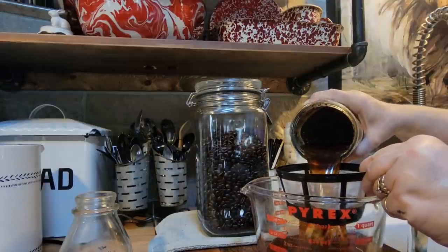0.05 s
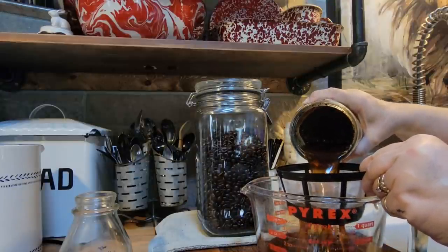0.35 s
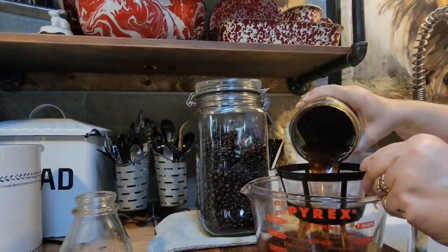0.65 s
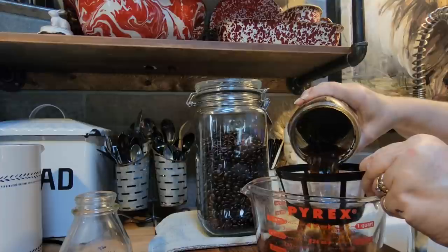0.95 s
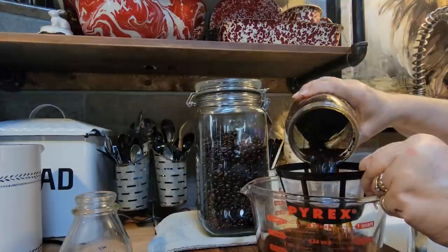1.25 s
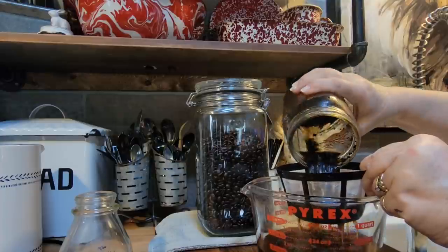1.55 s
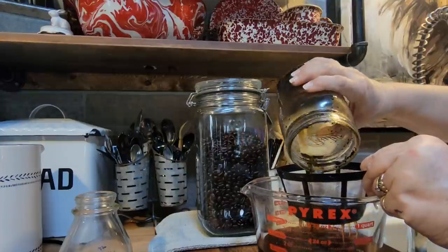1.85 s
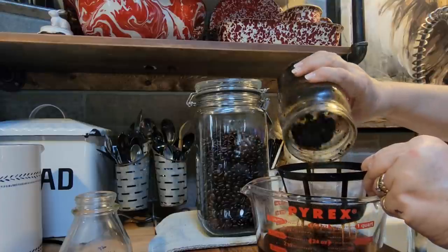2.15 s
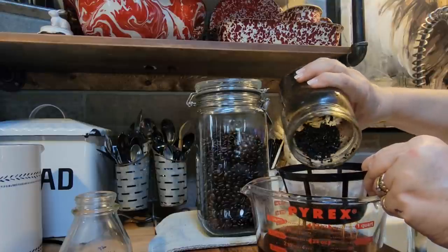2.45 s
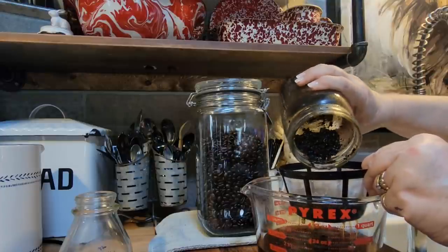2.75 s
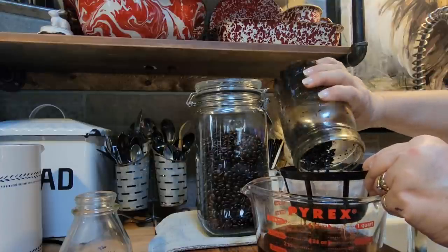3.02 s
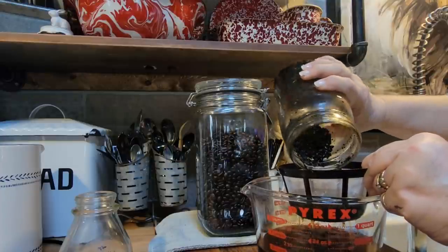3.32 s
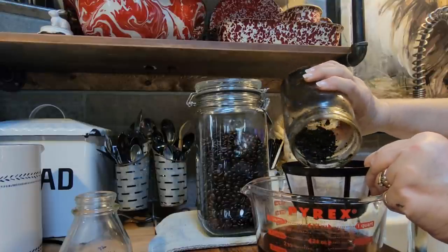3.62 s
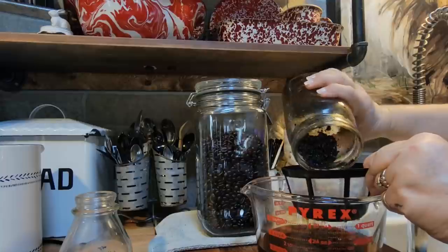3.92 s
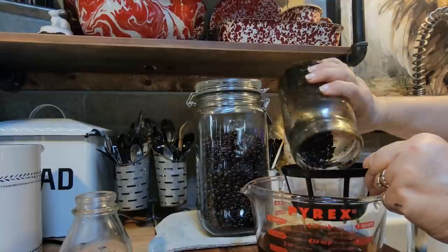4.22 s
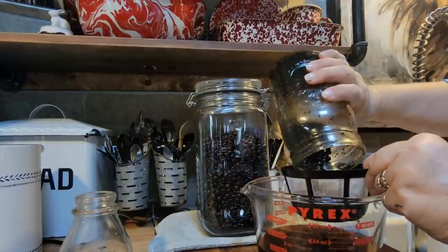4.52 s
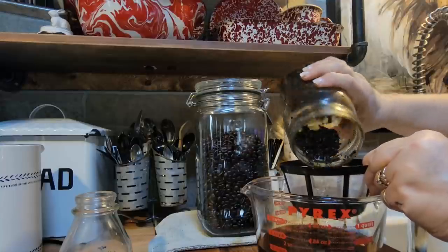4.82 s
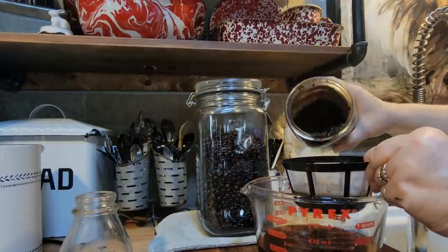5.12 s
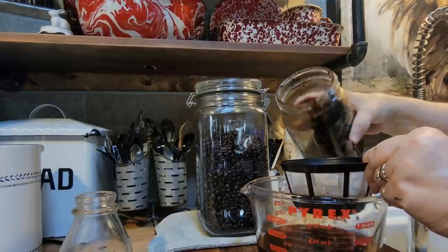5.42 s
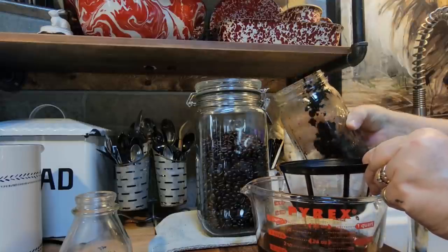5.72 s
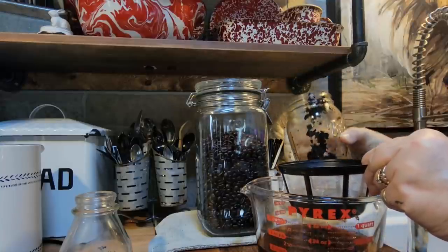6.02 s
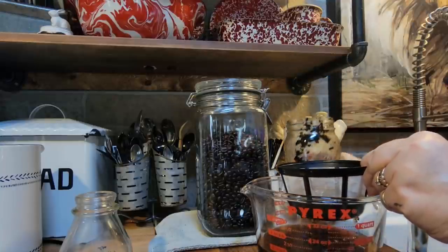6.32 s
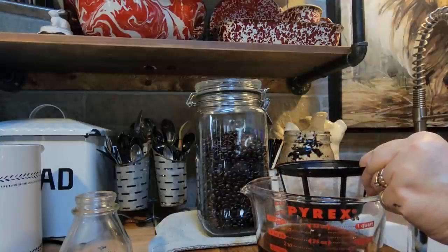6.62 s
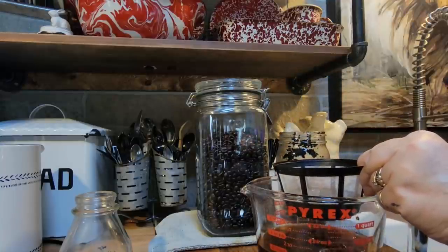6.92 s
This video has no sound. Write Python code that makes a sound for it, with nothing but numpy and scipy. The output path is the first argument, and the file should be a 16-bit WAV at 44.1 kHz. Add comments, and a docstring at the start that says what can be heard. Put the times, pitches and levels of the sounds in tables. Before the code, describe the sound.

Coffee splashes through a mesh filter into a glass cup, thinning to drips, then a glass jar clacks onto a wooden counter.

```python
"""Over the mains hum of a quiet kitchen, cold coffee pours from a jar through a mesh filter into a cup.
Impacts patter, trapped air bubbles resonate, and both drive faint ringing in the cup's glass wall.
The stream thins and spills a last splat at 2.4 s; single drips follow, and wet grounds tick in the mesh.
The filter frame bumps and then rubs the cup, and the jar slips in the fingers. At 6.8 s the empty jar
clacks down on the wooden counter, its free vibration damped by the hand."""
import sys
import numpy as np
from scipy import signal
from scipy.io import wavfile

SR = 44100
rng = np.random.default_rng(int(sys.argv[2]) if len(sys.argv) > 2 else 0)


def digitize_waveform(pressure):
    """Quantize a signal to 16-bit integers and store it at the path in sys.argv[1].

    Rows of a 2-D input are taken as channels; values are limited to [-1, 1].
    """
    field = np.atleast_2d(pressure).T
    bounded = np.clip(field, -1, 1)
    quanta = np.round(bounded * 32767).astype(np.int16)
    wavfile.write(sys.argv[1], SR, quanta)


N = 315756
TIME = np.arange(N) / SR
BAND_EDGE_HZ = 16200


def amp(db):
    """The decibel scale: 20 dB is a factor of ten in amplitude."""
    return 10 ** (np.asarray(db) / 20)


def unit(x):
    """Normalisation to an rms of 1."""
    return x / np.sqrt(np.mean(x ** 2) + 1e-20)


def at_hz(points, hz):
    """Interpolation on a logarithmic frequency axis."""
    freq_hz, value = np.transpose(points)
    return np.interp(np.log(hz + 1), np.log(freq_hz + 1), value)


def add(mix, start_s, sound):
    """Superposition: a sound sums into the mix from start_s on."""
    part = mix[max(round(start_s * SR), 0):][:len(sound)]
    part += sound[:len(part)]


def colour(x, spectrum):
    """Minimum-phase filtering shapes the spectrum and keeps attacks sharp."""
    log_gain = np.log(amp(at_hz(spectrum, abs(np.fft.fftfreq(4096, 1 / SR)))))
    taps = np.fft.ifft(np.exp(np.conj(signal.hilbert(log_gain)))).real
    return signal.oaconvolve(x, taps[:len(taps) // 2])[:len(x)]


def ringing(modes, rise_s=0.00052):
    """Free vibration: each normal mode is a damped sine, one to a row."""
    t = np.arange(SR // 2) / SR
    rings = np.array([amp(db - 60 * t / t60) * np.sin(2 * np.pi * hz * t) for hz, db, t60 in modes])
    return rings * (1 - np.exp(-t / rise_s))


def resonances(x, modes):
    """Forced vibration: a signal drives parallel resonators."""
    return sum(amp(db) * signal.lfilter(*signal.iirpeak(hz, hz / width, SR), x)
               for hz, width, db in modes)


def patter(per_s, spread_db, fade_s, wash):
    """Shot noise: the powers of random tiny impacts add to an even wash; rms 1."""
    chance = rng.random(N)
    size = np.minimum(rng.standard_exponential(N), 3)
    hits = (chance < per_s / SR) * amp(spread_db * size) ** 2
    power = signal.lfilter([1], [1, -np.exp(-1 / (fade_s * SR))], hits)
    return unit(rng.standard_normal(N) * np.sqrt(power / power.mean() + wash))


def bubble(hz, cycles, glide=0.025):
    """Minnaert resonance: trapped air rings and decays, rising in pitch as it nears the surface."""
    t = np.arange(SR // 16) / SR
    age = t * hz / cycles  # in decay time constants
    turns = np.cumsum(hz * (1 + glide * np.minimum(age, 4))) / SR
    onset = 1 - np.exp(-t * hz / 2.9)
    return np.sin(2 * np.pi * turns) * np.exp(-age) * onset


def swarm(low_hz, high_hz, per_s, cycles, spread_db, pitches=48):
    """A Poisson process: bubbles of many pitches and strengths ring independently; rms 1."""
    out = np.zeros(N)
    for hz in np.geomspace(low_hz, high_hz, pitches):
        chance = rng.random(N)
        size = np.minimum(rng.standard_exponential(N), 3.5)
        births = (chance < per_s / pitches / SR) * amp(spread_db * size)
        ring = hz * bubble(hz, cycles * rng.uniform(0.54, 2.6))
        out += signal.oaconvolve(births, ring)[:N]
    return unit(out)


def in_cup(x, echo_db=-5, fade_s=0.017, echoes=24):
    """Early reflections off the glass, different for each place a drop lands; peak 1."""
    delays_s = rng.uniform(0.00089, .02, echoes)
    size = rng.standard_normal(echoes) * np.exp(-delays_s / fade_s)
    out = x.copy()
    for delay_s, gain in zip(delays_s, amp(echo_db) * size / np.linalg.norm(size)):
        add(out, delay_s, gain * x)
    return out / abs(out).max()


def mains_hum(pitch_hz=59.4, level_db=-72):
    """A pure tone at the frequency of the alternating current."""
    return amp(level_db) * unit(np.sin(2 * np.pi * pitch_hz * TIME))


# spectrum of the kitchen's still air: freq_hz, gain_db
AIR_SPECTRUM = [(20, -6), (40, 10), (85, 8.5), (160, -1.5), (300, 1), (500, -4.5), (1200, -1), (2500, -6),
                (5000, 2.5), (8000, -3.5), (12000, -5), (16000, -14.5)]

def air(level_db=-74):
    """Ambient noise: soft, stationary and strongest in the bass."""
    return amp(level_db) * unit(colour(rng.standard_normal(N), AIR_SPECTRUM))


# reverberation time of the kitchen: freq_hz, t60_s
ROOM_DECAY = [(300, 0.1), (1500, 0.36), (4500, 0.25), (11000, 0.2), (16000, 0.44)]

def kitchen(x, build_s=0.0072):
    """Reverberation: diffuse echoes from shelf and walls decay at a rate set by frequency."""
    hz, t, bands = signal.stft(rng.standard_normal(SR // 2), SR, nperseg=256)
    decay = amp(-60 * t / at_hz(ROOM_DECAY, hz)[:, None])
    tail = signal.istft(bands * decay, SR, nperseg=256)[1]
    tail *= 1 - np.exp(-(np.arange(len(tail)) / SR / build_s) ** 2)
    return signal.oaconvolve(x, tail / np.linalg.norm(tail))[:N]


# soft bumps of the plastic filter frame on the cup: start_s, level_db
FRAME_BUMPS = [(3.125, -70.5), (3.186, -61.5), (3.235, -65), (3.493, -65)]
# resonances of the frame against the cup: pitch_hz, bandwidth_hz, gain_db
FRAME_MODES = [(933, 240, -7), (2006, 30, -6.5), (2570, 85, -4), (3490, 100, -6)]

def filter_frame(rise_s=0.0023, fade_s=0.028, rub_start_s=4.97, rub_length_s=0.82, rub_db=-79):
    """Contact excitation: dull bumps, then a rub along the rim, drive the modes of frame and cup."""
    rub_progress = np.clip((TIME - rub_start_s) / rub_length_s, 0, 1)
    contact = amp(rub_db) * np.sin(np.pi * rub_progress)
    t = np.arange(SR // 4) / SR
    for start_s, level_db in FRAME_BUMPS:
        add(contact, start_s, amp(level_db) * (1 - np.exp(-t / rise_s)) * np.exp(-t / fade_s))
    return contact * unit(resonances(rng.standard_normal(N), FRAME_MODES))


# envelope of the jar slipping round in the fingers: time_s, level_db
SLIP_ENVELOPE = [(5.68, -69), (5.78, -70), (5.88, -72), (5.94, -57), (5.975, -60), (6.008, -51.5),
                 (6.04, -61.5), (6.1, -87)]
# resonances of the rubbed jar: pitch_hz, bandwidth_hz, gain_db
SLIP_MODES = [(1934, 12, 4), (3570, 140, 7), (4800, 350, 1), (5950, 270, -16), (7540, 650, -11)]
# spectrum of the friction hiss: freq_hz, gain_db
SLIP_SPECTRUM = [(1500, -30), (3000, -1), (6000, -1), (9000, -1), (12000, -6.5), (16000, -20)]

def finger_slip(hiss_db=-7):
    """Stick-slip friction: fingers slide on the jar in tiny jerks that ring its glass."""
    jerks = patter(per_s=90, spread_db=3.5, fade_s=0.0015, wash=0.4)
    ring = unit(resonances(jerks, SLIP_MODES))
    hiss = amp(hiss_db) * unit(colour(jerks, SLIP_SPECTRUM))
    envelope = amp(np.interp(TIME, *np.transpose(SLIP_ENVELOPE), left=-np.inf, right=-np.inf))
    return envelope * unit(ring + hiss)


# the jar meets the counter with one edge, then flat: start_s, level_db
JAR_CONTACTS = [(6.7915, -42), (6.7945, -34.5), (6.7968, -38.5)]
# spectrum of glass striking wood: freq_hz, gain_db
CLACK_SPECTRUM = [(240, -57), (400, -44.5), (801, 2), (1220, -7), (1930, -8.5), (2120, -7), (3070, -9.5),
                  (3470, -2), (4050, -13), (4730, -0.5), (6340, -1.5), (8370, -4.5), (11600, 2),
                  (14400, -8), (16000, -16)]
# modes of the empty jar, damped by the hand: pitch_hz, gain_db, t60_s
JAR_MODES = [(1900, -5, .12), (3391, -6, .25), (4570, -7, .2), (6266, -7, .15), (6605, -9, .2),
             (7607, -9, .15), (10930, -7, .14), (11560, -7, .16)]
# modes of the wooden counter: pitch_hz, gain_db, t60_s
COUNTER_MODES = [(810, 5, 0.054), (877, 8, 0.035), (1020, -15, .04), (1370, -5, .12), (1900, -10, .06)]

def jar_set_down(clack_s=0.0045, ring_db=-27, counter_db=-57):
    """Impact excitation: each contact clacks and rings the jar; the first also sounds the counter."""
    ring = ringing(JAR_MODES).sum(0)
    t = np.arange(len(ring)) / SR
    out = np.zeros(N)
    add(out, JAR_CONTACTS[0][0], amp(counter_db) * ringing(COUNTER_MODES).sum(0))
    for start_s, level_db in JAR_CONTACTS:
        clack = unit(colour(rng.standard_normal(len(t)), CLACK_SPECTRUM)) * np.exp(-t / clack_s)
        add(out, start_s, amp(level_db) * (clack + amp(ring_db) * ring))
    return out


# envelope of the wet grounds seeping in the mesh: time_s, level_db
SEEP_ENVELOPE = [(2.7, -68), (3.08, -66), (3.78, -62), (3.9, -65.5), (4.87, -66.5), (5.53, -65),
                 (6.04, -65.5), (6.49, -68.5), (7.16, -68.5)]
# spectrum of their ticking: freq_hz, gain_db
SEEP_SPECTRUM = [(1500, -31), (2600, -4), (3600, 1), (6000, 3.5), (8000, -8), (11500, 4.5), (14000, -7.5),
                 (16000, -7)]

def wet_grounds(gain_db=-2, drained_db=-71, pips_db=-5):
    """Film rupture: liquid films burst among the draining grounds, and tiny drips ring as pips."""
    level = amp(np.interp(TIME, *np.transpose(SEEP_ENVELOPE), left=-np.inf))
    envelope = np.sqrt(np.maximum(level ** 2 - amp(drained_db) ** 2, 0))
    ticks = colour(patter(per_s=150, spread_db=3.2, fade_s=.0015, wash=1.0), SEEP_SPECTRUM)
    pips = in_cup(swarm(4200, 14500, per_s=60, cycles=9, spread_db=4.5, pitches=24))
    return amp(gain_db) * envelope * (unit(ticks) + amp(pips_db) * unit(pips))


# modes of the glass cup: pitch_hz, gain_db, t60_s
CUP_MODES = [(2030, 2, .38), (2207, -10, .22), (2653, -10, .2), (3527, -4, .2), (5157, -10, .2),
             (5943, -10, .2)]
# drips and one light knock that ring the cup's glass: start_s, lowest_mode_db, upper_modes_db
CUP_STRIKES = [(.527, -47, -33), (1.216, -43, -72), (1.625, -50, -69), (1.812, -46.5, -68),
               (1.925, -42.5, -58), (2.238, -53, -65), (2.474, -50.5, -64), (3.848, -64.5, -73),
               (4.271, -62.5, -69), (4.399, -68, -65), (5.232, -75, -68)]

def cup_ring(splashing, coupling_db=-57):
    """Sympathetic vibration: the glass rings under the splashing; drips and a knock also excite it."""
    modes = ringing(CUP_MODES)
    out = amp(coupling_db) * signal.oaconvolve(splashing, modes.sum(0))[:N]
    for start_s, lowest_mode_db, upper_modes_db in CUP_STRIKES:
        add(out, start_s, amp(lowest_mode_db) * modes[0] + amp(upper_modes_db) * modes[1:].sum(0))
    return out


# spectrum of a gush slapping the filter: freq_hz, gain_db
SPLAT_SPECTRUM = [(900, -24.5), (1300, -19), (1700, 10), (2600, -10), (3500, 5.5), (6000, 5.5), (9000, 4.5),
                  (12000, 5.5), (16000, -10)]

def splat(peak_s=2.38, peak_db=-25, rise_db_per_s=1111, fall_db_per_s=627.5):
    """A noise transient: liquid and grounds hit the filter, swelling and dying exponentially."""
    t = TIME - peak_s
    envelope = amp(peak_db + np.minimum(rise_db_per_s * t, -fall_db_per_s * t))
    spray = rng.standard_normal(N) * (rng.random(N) < .2)
    return envelope * unit(colour(spray, SPLAT_SPECTRUM))


# envelopes of the running liquid: time_s, gurgle_db, spatter_db
FLOW = [(0.0, -39.5, -36), (0.16, -50, -42), (0.43, -44, -43), (0.55, -48.5, -45.5), (0.82, -44, -45.5),
        (1.29, -47.5, -46), (1.54, -52.5, -49), (1.67, -58, -50), (2.07, -54, -51.5), (2.2, -64, -54.5),
        (2.44, -62.5, -53), (2.67, -63.5, -60.5), (2.8, -90, -76)]
# spectrum of the trapped air's gurgle: freq_hz, gain_db
GURGLE_SPECTRUM = [(300, -29.5), (480, -11.5), (640, -16), (820, -5), (1030, -17), (1350, -1.5),
                   (1650, 3.5), (2100, -2), (2800, -7), (3600, -4.5), (6000, -46)]
# spectrum of fine spatter: freq_hz, gain_db
SPATTER_SPECTRUM = [(1200, -27.5), (2400, 4.5), (3500, 1.5), (5500, 3), (8000, -0.5), (11500, 3.5),
                    (14000, 3), (16000, -13)]

def stream(gurgle_gain_db=1.0, spatter_gain_db=-2.0, fizz_gain_db=-8, thin_db=-64):
    """Air entrainment: the plunging stream traps large bubbles; spatter and fizz rise from the mesh."""
    time_s, gurgle_db, spatter_db = np.transpose(FLOW)
    plunge = amp(np.interp(TIME, time_s, gurgle_db, right=-np.inf))
    plunge = plunge ** 2 / (plunge + amp(thin_db))  # a thin trickle traps hardly any air
    spray = amp(np.interp(TIME, time_s, spatter_db, right=-np.inf))
    large_bubbles = swarm(550, 4200, per_s=1700, cycles=6.5, spread_db=4.5)
    impacts = patter(per_s=620, spread_db=5, fade_s=.001, wash=0.1)
    tiny_bubbles = swarm(2300, 13000, per_s=1400, cycles=12, spread_db=11, pitches=32)
    gurgle = amp(gurgle_gain_db) * unit(colour(large_bubbles, GURGLE_SPECTRUM))
    spatter = amp(spatter_gain_db) * unit(colour(impacts, SPATTER_SPECTRUM))
    fizz = amp(fizz_gain_db) * unit(colour(tiny_bubbles, SPATTER_SPECTRUM))
    return plunge * gurgle + spray * (spatter + fizz)


def drop_impact(hz, rise_s=.0004, tick_s=0.0018, spray_s=0.015, spray_db=-16):
    """Impact noise: a drop ticks on the surface and sprays; the smaller the drop, the thinner the tick."""
    t = np.arange(SR // 20) / SR
    envelope = (np.exp(-t / tick_s) + amp(spray_db) * np.exp(-t / spray_s)) * (1 - np.exp(-t / rise_s))
    burst = colour(rng.standard_normal(len(t)) * envelope, SPATTER_SPECTRUM)
    thinning = signal.butter(2, min(0.94 * hz, 6000), "highpass", fs=SR)
    return signal.lfilter(*thinning, burst)


def drop_bubbles(hz, cycles, small_count=3, small_db=-9, slosh_db=-15, slosh_s=0.0055):
    """Bubble entrainment: a drop traps one main bubble and a few lesser ones, and sloshes briefly."""
    out = bubble(hz, cycles)
    delays_s = rng.uniform(0, 0.0068, small_count)
    for delay_s, octaves in zip(delays_s, rng.uniform(-0.23, 0.43, small_count)):
        add(out, delay_s, amp(small_db) * bubble(min(hz * 2 ** octaves, SR / 2), cycles=5.7))
    t = np.arange(SR // 20) / SR
    near_pitch = signal.butter(2, [.9 * hz, min(1.7 * hz, BAND_EDGE_HZ + .3 * hz)], "bandpass", fs=SR)
    slosh = unit(signal.lfilter(*near_pitch, rng.standard_normal(len(t))))
    add(out, 0, amp(slosh_db) * slosh * np.exp(-t / slosh_s))
    return out


# drops that stand out of the stream, and single drips after it: start_s, bubble_db, pitch_hz, impact_db
DROPS = [(.0056, -24.5, 5750, -43), (0.0292, -25.5, 1512, -38), (.0301, -38.5, 650, -42),
         (0.0648, -18.5, 4080, -19.5), (0.115, -30.5, 1644, -24), (0.153, -27.5, 2550, -19),
         (0.1852, -23.5, 5340, -31), (0.1935, -28, 1530, -34), (.2074, -30.5, 1580, -30.5),
         (.211, -26.5, 2510, -20), (.301, -22.5, 9770, -31), (0.3299, -29.5, 1516, -40),
         (.3754, -28.5, 3570, -40), (.3985, -23.5, 2043, -39), (.4073, -36, 748, -42),
         (.4171, -39.5, 655, -40), (0.4262, -28, 1600, -24.5), (0.4449, -26, 4840, -34),
         (0.493, -30, 4250, -24), (.528, -24.5, 3420, -40), (.5482, -29, 2000, -25),
         (0.625, -26, 5770, -24), (0.6487, -28.5, 1165, -24), (0.6923, -29, 1346, -20.5),
         (.6983, -26.5, 818, -22), (.728, -32.5, 2470, -27.5), (.777, -36, 826, -24),
         (0.832, -28, 4020, -46), (.8628, -30, 6780, -33), (0.8782, -33, 11200, -25),
         (.937, -38.5, 860, -28), (.9533, -28, 2095, -31), (.97, -33, 2510, -26.5), (1.0032, -35, 863, -39),
         (1.036, -29, 1980, -21.5), (1.111, -28, 956, -22), (1.126, -23, 2600, -37),
         (1.238, -36.5, 1390, -33), (1.3131, -33, 2090, -23), (1.3515, -38, 6020, -25),
         (1.3998, -35.5, 2190, -22), (1.5097, -35, 12100, -22), (1.5194, -25, 12500, -37),
         (1.5298, -28, 5780, -28), (1.5615, -38, 2000, -26.5), (1.6419, -29.5, 7870, -25.5),
         (1.6764, -31, 13800, -45), (1.7009, -31, 9800, -31.5), (1.8112, -23, 3316, -21.5),
         (1.925, -30, 1656, -29), (2, -31, 3240, -22.5), (2.026, -55, 12100, -25.5),
         (2.0718, -25.5, 10600, -34), (2.078, -35.5, 1967, -47), (2.1136, -41, 5740, -38),
         (2.215, -38, 10300, -24.5), (2.2366, -38, 2110, -27.5), (2.2894, -36, 3390, -53),
         (2.3599, -36, 1710, -42), (2.4547, -33, 2500, -32), (2.4752, -34, 2330, -22.5),
         (2.508, -39.5, 1676, -28.5), (2.524, -37, 1820, -35), (2.5643, -36, 3710, -30.5),
         (2.7021, -30, 13400, -33.5), (2.735, -32, 5800, -43), (2.8292, -50, 3300, -43),
         (2.8507, -50, 938, -44), (2.868, -27.5, 11300, -51), (2.9398, -35, 12300, -44),
         (3.004, -41, 7200, -44), (3.0473, -49, 4680, -60), (3.0817, -50, 5630, -46.5),
         (3.181, -45.5, 3360, -64), (3.3656, -40.5, 3650, -43.5), (3.4607, -43.5, 9050, -64),
         (3.51, -42, 10150, -42.5), (3.5397, -36.5, 4240, -37.5), (3.5748, -37.5, 5300, -31.5),
         (3.628, -47, 6960, -41), (3.7152, -40.5, 6680, -54), (3.7777, -37.5, 6580, -39.5),
         (3.8228, -46, 10100, -40), (3.8469, -44, 2770, -43), (3.906, -40.5, 12650, -36.5),
         (4.074, -45, 10900, -41.5), (4.106, -45, 3470, -40.5), (4.1504, -36.5, 6900, -36),
         (4.2696, -40.5, 3120, -40), (4.2714, -37, 6530, -38.5), (4.3436, -43.5, 4620, -62),
         (4.3993, -33.5, 2674, -44), (4.5354, -36, 12350, -47), (4.5632, -37, 4400, -40),
         (4.575, -33.5, 5630, -35.5), (4.6484, -39.5, 11400, -35.5), (4.6848, -36.5, 5530, -47),
         (4.7922, -49, 4720, -39), (4.892, -41.5, 10960, -56), (4.948, -42, 4070, -50),
         (4.9665, -37, 5560, -44), (5.0898, -39, 4360, -52), (5.218, -42, 10670, -38.5),
         (5.227, -39.5, 8330, -41.5), (5.2314, -45.5, 2606, -60), (5.3036, -39, 4460, -48),
         (5.6355, -46.5, 4140, -43), (5.8244, -41.5, 6000, -36), (6.1952, -47.5, 5200, -41.5),
         (6.246, -47.5, 14500, -55), (6.52, -56, 3780, -67), (6.6963, -37.5, 11800, -57),
         (7.041, -55, 4860, -63)]

def drops(stirred_cycles=6, calm_cycles=13.2, tick_gain_db=-3,
          droplets=2, droplet_hz=7044, droplet_gain_db=-12.5, max_flight_s=0.038):
    """Impact and bubble resonance: each drop ticks, rings and throws up droplets that fall back."""
    out = np.zeros(N)
    stream_end_s = FLOW[-1][0]
    for start_s, bubble_db, pitch_hz, impact_db in DROPS:
        # bubbles ring longer once the stream stops stirring the surface
        cycles = stirred_cycles if start_s < stream_end_s else calm_cycles
        cycles *= (pitch_hz / 3450) ** 0.31  # small bubbles ring for more cycles
        tick = drop_impact(pitch_hz)
        trapped_air = drop_bubbles(pitch_hz, cycles)
        add(out, start_s, amp(bubble_db) * in_cup(trapped_air))
        add(out, start_s, amp(impact_db + tick_gain_db) * in_cup(tick))
        flights_s = max_flight_s * rng.random(droplets)
        for flight_s, octaves in zip(flights_s, rng.uniform(-1, 1, droplets)):
            droplet = in_cup(bubble(droplet_hz * 2 ** octaves, cycles=6))
            add(out, start_s + flight_s, amp(impact_db + droplet_gain_db) * droplet)
    return out


# stereo side spectrum of the echoes: freq_hz, gain_db
ECHO_SIDE = [(300, -16), (700, -28), (2200, -29), (5000, -26), (12000, -25)]
# stereo side spectrum of the still air: freq_hz, gain_db
AIR_SIDE = [(60, -6), (200, -9), (1000, -11), (4000, -21.5), (12000, -0.5)]

def scene(liquid_room_db=-8, contact_room_db=-6, air_side_db=-8, cup_cutoff_hz=480):
    """Mid-side stereo: the sources sit straight ahead; only a trace of room and air spreads sideways."""
    liquid = drops() + stream() + splat() + wet_grounds()
    bass_cut = signal.butter(3, cup_cutoff_hz, "highpass", fs=SR, output="sos")
    liquid = signal.sosfilt(bass_cut, liquid)  # a small cup radiates no bass
    liquid = liquid + cup_ring(liquid)
    contacts = jar_set_down() + finger_slip() + filter_frame()
    echoes = kitchen(amp(liquid_room_db) * liquid + amp(contact_room_db) * contacts)
    mid = liquid + contacts + echoes + mains_hum() + air()
    side = colour(kitchen(liquid + contacts), ECHO_SIDE) + amp(air_side_db) * colour(air(), AIR_SIDE)
    return np.array([mid + side, mid - side])


def record(dry):
    """Band limiting: a steep linear-phase low-pass removes the highest treble."""
    taps = signal.firwin(511, BAND_EDGE_HZ, window=("kaiser", 9), fs=SR)
    return signal.oaconvolve(dry, taps[None], "same")


dry = scene()
out = record(dry)
digitize_waveform(out)
```